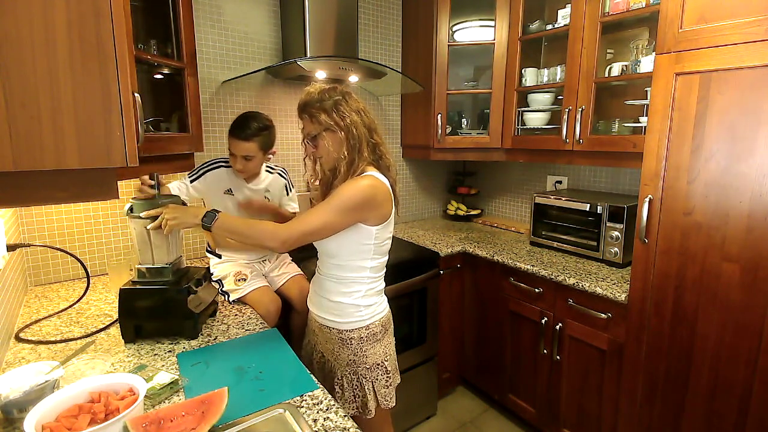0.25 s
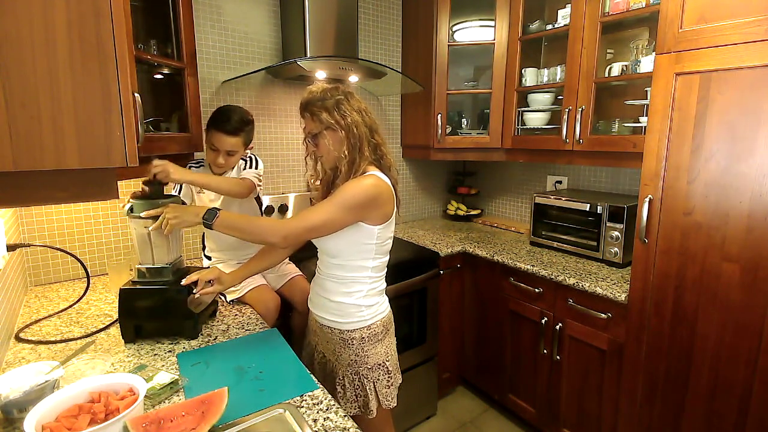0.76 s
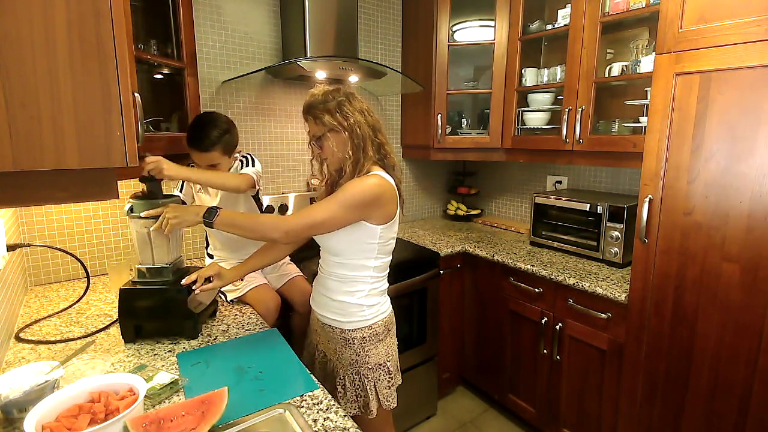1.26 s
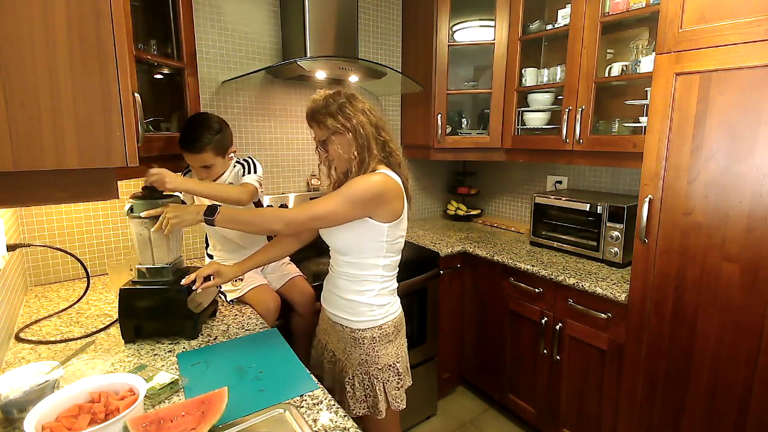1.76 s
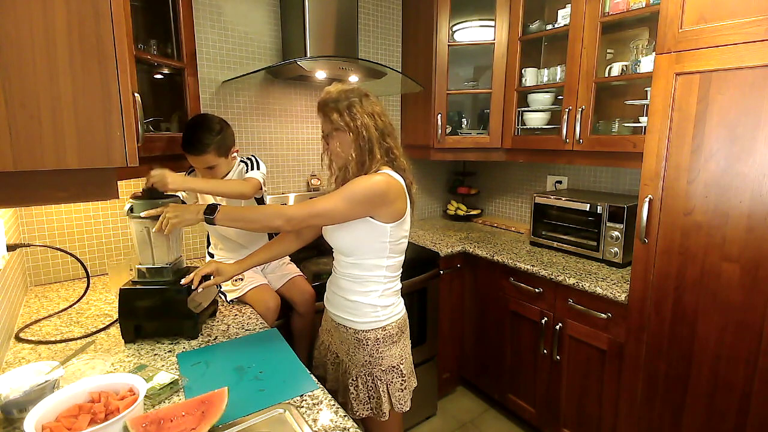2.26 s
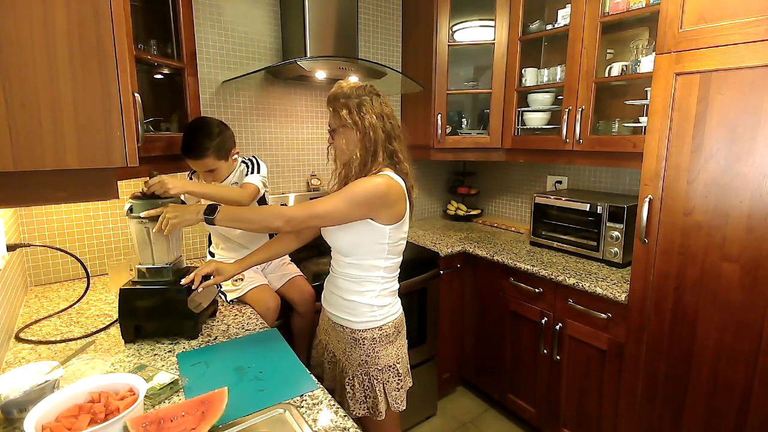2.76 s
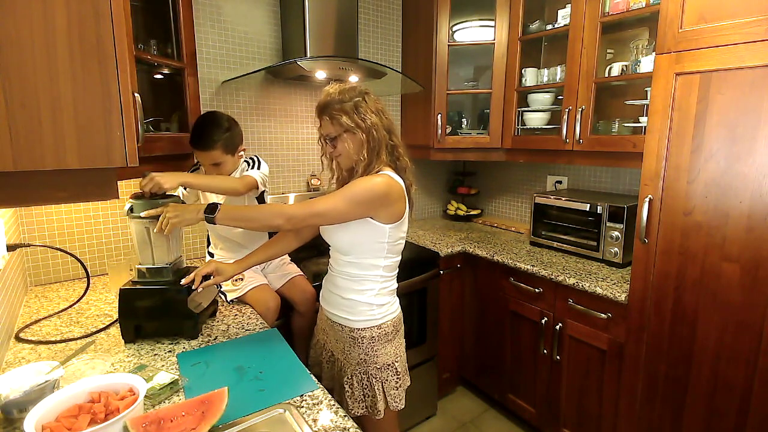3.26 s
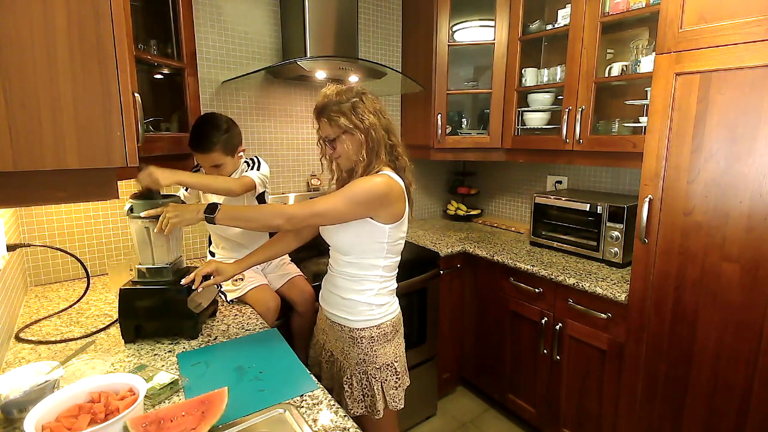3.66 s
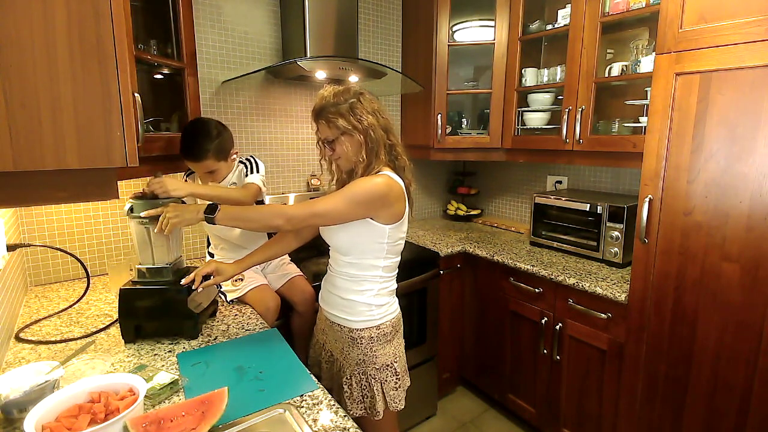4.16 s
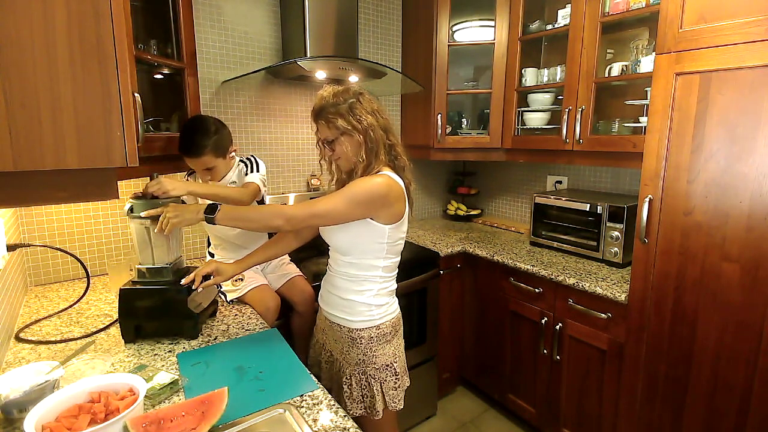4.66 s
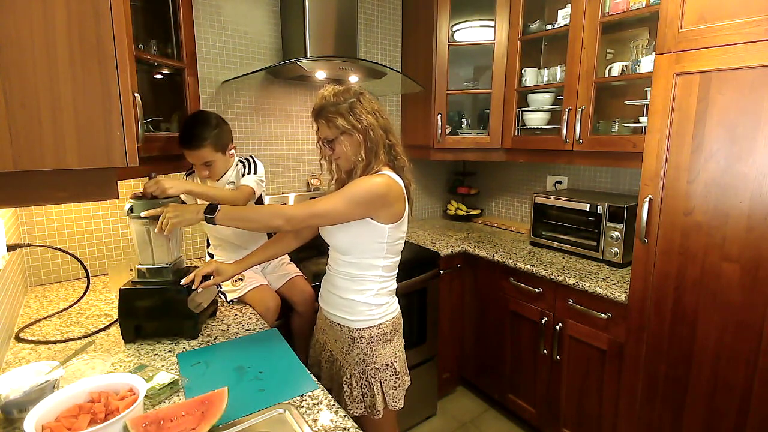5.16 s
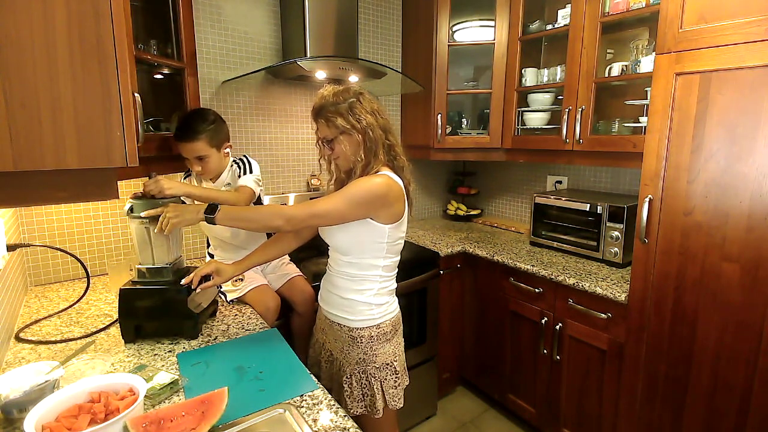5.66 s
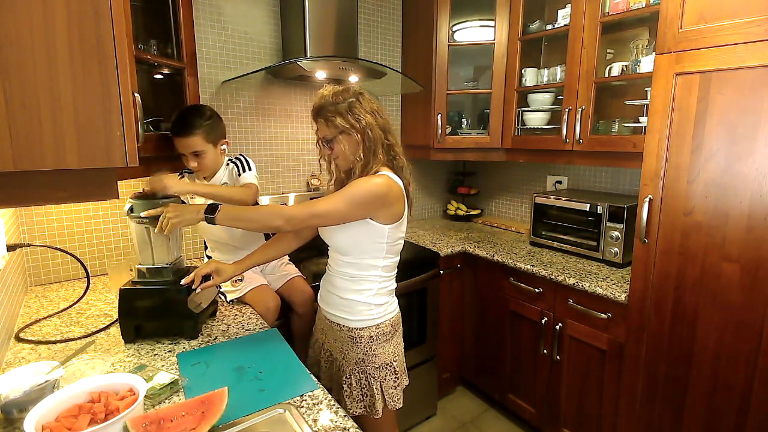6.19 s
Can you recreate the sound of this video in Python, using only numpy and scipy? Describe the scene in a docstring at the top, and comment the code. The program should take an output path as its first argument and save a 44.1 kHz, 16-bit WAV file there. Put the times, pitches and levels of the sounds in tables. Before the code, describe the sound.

A countertop blender roars steadily in a kitchen, with thin whines, gritty scrapes and chunks knocking the jar as the mix loosens.

```python
"""A blender roars on a kitchen counter, with thin whines, ticks, scrapes, knocks, low thuds and dull thumps.
Noise for swirling pulp and motor air rings the jar and housing; it brightens as the mix turns liquid.
The roar flares and pieces rattle where the blade catches a chunk. Whines are gliding sines, spray is
filtered ticks, scrapes are gritty band noise, knocks are short wandering rings, thumps are brief pushes.
The recorder leaves out the top, so all of it sounds dull above."""
import sys
import numpy as np
from scipy import signal
from scipy.fft import irfft, next_fast_len
from scipy.io import wavfile
from scipy.ndimage import uniform_filter1d

SR = 44100
rng = np.random.default_rng(int(sys.argv[2]) if len(sys.argv) > 2 else 0)


def output_pcm(signal):
    """Save a mono or channel-first signal as 16-bit PCM at the path in sys.argv[1].

    Samples are clipped to [-1, 1] before scaling.
    """
    pcm = np.clip(np.atleast_2d(signal).T, -1, 1) * 32767
    wavfile.write(sys.argv[1], SR, np.round(pcm).astype(np.int16))


N = 283563
T = np.arange(N) / SR

# Roar between catches. Each row: time in seconds, level in dB, low mids against it in dB (only their
# departure from the mean of the last third counts), counter hum level in dB.
CHURN_COURSE = [(0.0, -39.5, -27.5, -90), (0.45, -40, -21, -91), (0.62, -40, -28, -100),
                (0.92, -39.5, -25, -102), (1.1, -39.5, -24, -90), (1.45, -38, -22, -86),
                (1.75, -36, -20.5, -80), (2.17, -36.5, -18.5, -80.5), (2.4, -36.5, -19, -74.5),
                (2.55, -37, -22.5, -73.5), (2.7, -37.5, -19.5, -77), (2.9, -37.5, -21.5, -75),
                (3.1, -36, -23.5, -77.5), (3.45, -37.5, -30.5, -90), (3.8, -37, -21.5, -84),
                (4.15, -38, -28.5, -93), (4.5, -37.5, -27, -97), (5.4, -38, -27, -86),
                (6.43, -36.5, -31.5, -90)]
# How liquid the mix is. Each row: time in seconds, share from 0 thick to 1 liquid.
LIQUID_COURSE = [(0, 0.13), (1.3, 0.14), (1.6, 0.55), (4.2, 0.92), (6.43, 0.86)]
# Spectrum of the broad roar. Each row: frequency in Hz, relative density in dB per Hz.
ROAR_SPECTRUM = [(30, -35), (295, -32.5), (330, -30), (540, -19), (580, -14.5), (790, -10), (815, -0.5),
                 (1120, -10), (1250, -1), (2400, -1.5), (2850, -8), (3400, -5), (6700, -11), (7550, -15.5),
                 (7700, -23.5), (8750, -33), (9300, -66.5)]
# Jar and housing resonances. Each row: centre in Hz, width in Hz, level against the roar in dB with a
# thick mix, the same with a liquid mix.
JAR_MODES = [(327.6, 26, -44.5, -35.5), (448, 40, -41, -38), (587.4, 69, -35, -38), (829.5, 25.6, -20, -18),
             (996, 233, -20.5, -14.5), (1269, 200, -18, -12.5), (1490, 34, -10, -26.5),
             (1641, 39, -21.5, -14.5), (1738, 25, -15, -38.5), (2040, 89, -13.5, -21), (2140, 95, -27, -16),
             (2316, 110, -34.5, -10.5), (3024, 210, -12.5, -15), (3290, 32, -15.5, -21),
             (2653, 150, -32.5, -15.5), (4080, 68, -14.5, -26.5), (5800, 350, -23, -17)]
# Thin motor whines. Each row: start in seconds, length in seconds, start in Hz, end in Hz, level in dB.
MOTOR_WHINES = [(0.0, 0.17, 2040, 2070, -49), (0.0, 0.07, 1465, 1486, -47), (0.11, 0.19, 1490, 1480, -50),
                (0.28, 0.18, 1454, 1408, -52), (0.302, 0.13, 2050, 2090, -51),
                (0.5, 0.15, 1530, 1490, -54.5), (0.646, 0.14, 1710, 1690, -53),
                (0.656, 0.071, 2050, 2060, -43.5), (0.8, 0.086, 2070, 2080, -50),
                (0.939, 0.12, 2010, 2060, -48), (0.96, 0.11, 2140, 2180, -49), (1.0, 0.22, 1515, 1520, -53),
                (1.361, 0.15, 2085, 2050, -48.5), (1.702, 0.63, 3290, 3256, -55.5),
                (1.782, 0.55, 1665, 1660, -56), (2.87, 0.11, 2000, 2060, -51), (3.3, 0.41, 2130, 2124, -52),
                (4.047, 0.54, 3270, 3280, -54), (4.55, 0.34, 2116, 2123, -50),
                (4.94, 0.24, 2120, 2090, -50.5), (5.25, 0.11, 2115, 2080, -52),
                (4.863, 0.43, 3280, 3270, -53), (5.549, 0.38, 3290, 3265, -53),
                (6.197, 0.26, 3280, 3280, -53)]
# Knocks and low thuds. Each row: peak time in seconds, level in dB, pitch in Hz.
KNOCKS_AND_THUDS = [(0.41, -42, 980), (0.837, -41, 1504), (1.212, -38, 2065), (1.217, -37.5, 1460),
                    (1.316, -40, 1450), (1.351, -33, 1320), (1.352, -37, 1630), (1.348, -33.5, 1453),
                    (1.513, -44, 3800), (1.494, -38, 1173), (1.52, -47.5, 592), (1.558, -40, 2320),
                    (1.556, -37, 3450), (1.562, -39, 2970), (1.585, -40, 3110), (1.608, -44, 2900),
                    (1.657, -38, 1265), (1.643, -38, 1314), (1.652, -47, 3070), (1.67, -39.5, 4180),
                    (1.674, -45, 5380), (1.749, -41, 5180), (1.751, -42, 932), (1.816, -57, 325),
                    (1.826, -37, 1630), (1.969, -39, 1370), (2.036, -54, 510), (2.054, -40, 1014),
                    (2.261, -55, 480), (2.14, -57, 445), (2.46, -66, 466), (2.25, -70, 192),
                    (2.349, -38.5, 890), (2.53, -68, 191), (2.498, -40.5, 990), (2.561, -34, 1630),
                    (3.068, -37, 2580), (3.084, -32, 2420), (3.159, -33.5, 2410), (3.197, -31.5, 1625),
                    (3.211, -41.5, 820), (3.308, -41.5, 737), (3.567, -36, 2346), (3.586, -37, 3450),
                    (3.59, -62, 570), (3.601, -35.5, 2470), (3.626, -37, 2440), (3.64, -50, 540),
                    (3.67, -36, 3010), (3.707, -37, 2540), (3.657, -33, 2770), (3.601, -39, 840),
                    (3.67, -40, 807), (3.718, -40.5, 817), (3.714, -35, 2940), (3.72, -36, 3260),
                    (3.724, -46.5, 530), (3.885, -57, 470), (3.95, -52, 450), (3.956, -30.5, 1228),
                    (3.965, -35, 4070), (4.179, -34, 2420), (5.113, -44, 2380), (5.15, -40, 1254),
                    (5.278, -38, 1716), (5.522, -43, 4100), (6.028, -40.5, 844)]
# The blade catches and grinds a chunk. Each row: start in seconds, length in seconds, rise of the roar
# in dB, extra change of its low mids in dB.
CHUNK_CATCHES = [(0.275, 0.057, 1, -4), (0.346, 0.059, 3, -2), (0.66, 0.084, 0.5, -5), (1.206, 0.015, 2, 5),
                 (1.308, 0.067, 0, 2), (1.493, 0.18, 2, 2), (1.763, 0.029, 0.5, -12),
                 (2.015, 0.052, 0.5, 6), (2.12, 0.028, 1, 5), (2.234, 0.047, 0.5, 1),
                 (2.491, 0.069, 0.5, 5), (2.966, 0.11, 0.5, 4), (3.123, 0.093, 0, 4),
                 (3.3, 0.041, 0.5, 11.5), (3.551, 0.034, 1.5, 4), (3.595, 0.084, 1.5, 10.5),
                 (3.71, 0.024, 0, 13), (3.836, 0.1, 1, 3), (3.935, 0.045, 1.5, 6), (4.155, 0.036, 0, 13)]
# A chunk scrapes along the wall. Each row: start in seconds, length in seconds, centre in Hz,
# width in Hz, level in dB.
WALL_SCRAPES = [(0.27, 0.046, 2600, 200, -48), (0.353, 0.065, 3120, 600, -48),
                (0.337, 0.07, 2150, 500, -48), (1.2075, 0.014, 1800, 1400, -36),
                (1.225, 0.12, 1450, 400, -43), (1.333, 0.032, 1500, 700, -40),
                (1.505, 0.023, 4400, 2000, -45), (1.552, 0.015, 3200, 2000, -46),
                (1.578, 0.053, 865, 150, -43), (1.646, 0.047, 450, 140, -52.5),
                (1.66, 0.025, 4800, 2200, -48), (1.731, 0.073, 890, 200, -42.5),
                (2.23, 0.035, 835, 120, -45), (2.234, 0.04, 5500, 1500, -44.5),
                (2.26, 0.053, 2450, 400, -44), (2.33, 0.04, 1700, 700, -44), (2.399, 0.05, 1500, 700, -43),
                (2.486, 0.053, 2250, 250, -43), (2.98, 0.07, 2400, 500, -44), (3.142, 0.04, 2370, 600, -39),
                (3.301, 0.03, 487, 160, -55), (3.299, 0.035, 4500, 3000, -48),
                (3.552, 0.036, 3380, 250, -41), (3.575, 0.018, 4220, 800, -39),
                (3.591, 0.085, 500, 200, -51.5), (3.603, 0.035, 5830, 600, -50),
                (3.622, 0.03, 5000, 600, -41), (3.655, 0.02, 3800, 1400, -46),
                (3.846, 0.035, 2700, 600, -40), (3.868, 0.076, 5800, 300, -47),
                (3.94, 0.045, 5370, 1200, -40), (3.95, 0.022, 4300, 900, -49),
                (3.994, 0.04, 5950, 400, -44), (4.6, 0.16, 2170, 400, -43.5)]
# A heavy lump thumps the jar on the counter. Each row: centre time in seconds, level in dB, pitch in Hz.
JAR_THUMPS = [(1.515, -70, 150), (1.672, -62, 170), (1.777, -51, 230), (2.47, -64, 200), (3.312, -60, 190),
              (3.726, -72, 170), (3.955, -67, 180)]

THICK_TREBLE_DB, THICK_RUMBLE_DB = -5.5, 0.5  # fully thick against fully liquid
CATCH_TREBLE_SHARE, CATCH_RUMBLE_SHARE = 0.42, 0.14  # dB per dB of a catch's roar rise, low-mid change
RUMBLE_PER_LOW_MID = 0.35  # dB per dB
COUNTER_HZ, COUNTER_WIDTH_HZ = 191, 28
WHINE_EDGE_S, WHINE_WAVER, WHINE_FLUTTER_DB = 0.028, 0.003, 2.5  # waver as share of pitch
SPRAY_DB, SPRAY_PER_S, SPRAY_SPREAD_DB = -13.5, 1600, 5.5
SPRAY_CATCH_GAIN = 2.3  # dB per dB of a catch
SPRAY_LOW_HZ, SPRAY_HIGH_HZ = 2700, 6230
KNOCK_RISE = 0.3  # share of the length
KNOCK_MS, KNOCK_CYCLES = 16.5, 10.5  # length: fixed part plus cycles of the pitch
CRACK_DB = -9  # each crack partial against its knock
SPLINTER_DB, SPLINTER_SPREAD_DB = -18.5, 4
SPLINTER_CATCH_SHARE = 0.5  # extra dB per dB of a catch
CATCH_EDGE_S = 0.031
SCRAPE_ATTACK, SCRAPE_RELEASE = 0.15, 0.35  # shares of the length
SCRAPE_ROUGH_DB, SCRAPE_GRAIN_MS = 3.5, 3
RATTLE_DB, RATTLE_GAP_S, RATTLE_MS = 3, 0.009, 24  # least level against the mode; mean gap; length
THUMP_CYCLES = 0.45  # spread of the bell-shaped push
TOP_HZ = 8900


def undb(db):
    """Gain of a level in dB."""
    return np.exp(np.asarray(db) * (np.log(10) / 20))


def unit(x):
    """Scaled to rms 1."""
    return x / np.sqrt(np.mean(x ** 2))


def smooth_twice(x, size):
    """Two moving averages in a row."""
    return uniform_filter1d(uniform_filter1d(x, size), size)


def walk(rate_hz):
    """Random levels, each held for one period of the rate, then slewed twice; rms 1."""
    hold = int(SR / rate_hz)
    steps = np.repeat(rng.standard_normal(N // hold + 1), hold)
    return unit(smooth_twice(steps, hold)[:N])


def coloured(gain):
    """Fresh noise with the given gain per frequency bin."""
    size = next_fast_len(N)
    bins = np.arange(size // 2 + 1)
    spectrum = rng.standard_normal(size // 2 * 2 + 2).view(complex)
    return irfft(spectrum * gain(bins * SR / size + 1), size)[:N]  # + 1 Hz keeps the logs finite


def resonance(centre_hz, width_hz, drift=.003):
    """Noise ringing in one resonance whose centre drifts a little, rms 1."""
    pole = np.exp(-np.pi * width_hz / SR)
    swing = signal.lfilter([1], [1, -2 * pole, pole ** 2], rng.standard_normal((2, N)))
    phase = 2 * np.pi * centre_hz / SR * np.cumsum(1 + drift * walk(6))
    return unit(swing[0] * np.cos(phase) + swing[1] * np.sin(phase))


def roar(treble_db, low_db, rumble_db, liquid):
    """Turbulent pulp and air as broad noise bands with common and separate level changes, plus jar resonances."""
    spectrum_hz, spectrum_db = np.transpose(ROAR_SPECTRUM)
    surge = walk(6.3)

    def tilt_db(hz):
        """Departure of the roar around hz from its mean over the last third."""
        if hz < 390:
            course_db = rumble_db
        elif hz < 620:
            course_db = low_db
        else:
            course_db = treble_db if hz > 2700 else np.zeros(N)
        return course_db - course_db[-N // 3:].mean()

    out = np.zeros(N)
    for centre_hz in 40 * 2 ** np.arange(0, 8, .5):
        def band_gain(hz):
            """Roar spectrum under a cosine window, half an octave to each side."""
            window = np.cos(np.pi / 2 * np.clip(2 * np.log2(hz / centre_hz), -1, 1))
            return undb(np.interp(np.log(hz), np.log(spectrum_hz), spectrum_db)) * window

        # bands above 7 kHz: faster, deeper random level changes
        change_db = 1.18 * walk(25) if centre_hz < 7000 else 1.75 * walk(60)
        out += coloured(band_gain) * undb(tilt_db(centre_hz) + 0.1 * surge + change_db)
    out = undb(-1.0) * out / np.sqrt(np.mean(out[-N // 3:] ** 2))
    for centre_hz, width_hz, thick_db, liquid_db in JAR_MODES:
        # the sloshing mix damps each resonance on and off
        mode_db = thick_db + (liquid_db - thick_db) * liquid
        out += resonance(centre_hz, width_hz) * undb(mode_db + tilt_db(centre_hz) + 2.03 * walk(18))
    return out


def counter_hum(level_db):
    """Noise ringing one low resonance of the counter, its level wandering slowly."""
    return resonance(COUNTER_HZ, COUNTER_WIDTH_HZ) * undb(level_db + 2.5 * walk(3.1))


def whines():
    """Near-pure tones that glide, waver in pitch and flutter in level."""
    out = np.zeros(N)
    waver, flutter_db = WHINE_WAVER * walk(14), WHINE_FLUTTER_DB * walk(30)
    shifts = rng.integers(0, N, len(MOTOR_WHINES))  # each whine reads the wander elsewhere
    for (start_s, length_s, start_hz, end_hz, db), shift in zip(MOTOR_WHINES, shifts):
        on = slice(int(max(start_s, 0) * SR), int((start_s + length_s) * SR))
        age_s = T[on] - start_s
        glide_hz = start_hz + (end_hz - start_hz) * age_s / length_s
        hz = glide_hz * (1 + np.roll(waver, shift)[on])
        fade = np.clip(np.minimum(age_s, length_s - age_s) / WHINE_EDGE_S, 0, 1)
        gain = np.sqrt(2) * fade * undb(db + np.roll(flutter_db, shift)[on])
        out[on] += gain * np.sin(2 * np.pi * np.cumsum(hz) / SR)
    return out


def spray(level_db):
    """Grit and droplets flung at the wall: dense sharp ticks of uneven size."""
    hit, size, sign = rng.random((3, N))
    size_gain = undb(-SPRAY_SPREAD_DB * np.log(size + 0.0059))
    ticks = (hit < SPRAY_PER_S / SR) * size_gain * np.sign(sign - .5)
    band = signal.butter(5, [SPRAY_LOW_HZ, SPRAY_HIGH_HZ], "bandpass", fs=SR, output="sos")
    return unit(signal.sosfilt(band, ticks)) * undb(level_db + SPRAY_DB)


def add_knock(out, peak_s, db, hz, length_ms, chance, noisy):
    """One knock: a short ring that swells and dies, its pitch wandering at random."""
    n = int(length_ms * SR / 1000)
    i = int(peak_s * SR - KNOCK_RISE * n)
    if i >= 0 and i + n < N:
        two_cycles = int(2 * SR / hz)
        wander = noisy * np.sqrt(hz / SR) * np.cumsum(smooth_twice(chance, two_cycles)[:n])
        age = np.linspace(0, 1, n)
        shape = np.sin(np.pi * age ** (np.log(.5) / np.log(KNOCK_RISE))) ** 2
        ring = np.sin(2 * np.pi * hz * T[:n] + wander + 2 * chance[-1])
        out[i:i + n] += undb(db) * np.sqrt(2) * shape * ring


def knocks_and_splinters(level_db):
    """Listed knocks and low thuds, each a ring and a broader crack, over small splinters."""
    out, cracks = np.zeros(N), np.zeros(N)
    for peak_s, db, hz in KNOCKS_AND_THUDS:
        length_ms = KNOCK_MS + 1000 * KNOCK_CYCLES / hz
        add_knock(out, peak_s, db, hz, length_ms, rng.standard_normal(6000), noisy=0.086)
        for pitch in rng.standard_normal(3):
            crack_hz = hz * 2 ** (0.05 + 0.2 * pitch)
            add_knock(cracks, peak_s, db, crack_hz, length_ms, rng.standard_normal(6000), noisy=0.83)
    # the splinters follow the level of the roar
    for when, pitch, size, length in rng.random((700, 4)):
        db = level_db[int(when * N)] + SPLINTER_DB - SPLINTER_SPREAD_DB * np.log(size + 0.025)
        hz, length_ms = 800 * 2 ** (2.6 * pitch), 5.202 + 15 * length
        add_knock(out, when * N / SR, db, hz, length_ms, rng.standard_normal(1500), noisy=0.92)
    return out + undb(CRACK_DB) * cracks


def catches():
    """Change of the whole roar and extra change of its low mids, in dB, with straight edges in and out."""
    rise_db, low_db = np.zeros(N), np.zeros(N)
    for start_s, length_s, db, extra_db in CHUNK_CATCHES:
        inside_s = np.minimum(T - start_s, start_s + length_s - T)
        hold = np.clip(inside_s / CATCH_EDGE_S + .5, 0, 1)
        rise_db += db * hold
        low_db += extra_db * hold
    return rise_db, low_db


def scrapes():
    """Grainy noise in one band: quick start, uneven hold, softer end."""
    out = np.zeros(N)
    grain = int(SCRAPE_GRAIN_MS * SR / 1000)
    for start_s, length_s, hz, width_hz, db in WALL_SCRAPES:
        i, n = int(start_s * SR), int(length_s * SR)
        hiss, rough = rng.standard_normal((2, 8000))
        band = signal.butter(2, [hz - width_hz / 2, hz + width_hz / 2], "bandpass", fs=SR, output="sos")
        age = np.linspace(0, 1, n)
        shape = np.clip(np.minimum(age / SCRAPE_ATTACK, (1 - age) / SCRAPE_RELEASE), 0, 1)
        grit = hiss * undb(SCRAPE_ROUGH_DB * unit(uniform_filter1d(rough, grain)))
        out[i:i + n] += unit(signal.sosfilt(band, grit)[-n:]) * shape * undb(db)
    return out


def rattle(level_db):
    """Pieces of a ground chunk clatter on the wall, each ringing one upper resonance of the jar."""
    out = np.zeros(N)
    upper = [mode for mode in JAR_MODES if mode[0] > 700]
    for start_s, length_s, _, _ in CHUNK_CATCHES:
        for step, (late, which, size) in enumerate(rng.random((30, 3))):
            peak_s = start_s + RATTLE_GAP_S * (step + late)
            chance = rng.standard_normal(3000)
            if peak_s < start_s + length_s:
                hz, _, _, liquid_db = upper[int(which * len(upper))]
                db = level_db[int(peak_s * SR)] + RATTLE_DB + liquid_db + 6 * size
                add_knock(out, peak_s, db, hz, RATTLE_MS, chance, noisy=0.5)
    return out


def thumps():
    """One dull push each, hardly more than a cycle."""
    out = np.zeros(N)
    for centre_s, db, hz in JAR_THUMPS:
        near = slice(int((centre_s - .03) * SR), int((centre_s + .03) * SR))
        turns = (T[near] - centre_s) * hz
        bell = np.exp(-.5 * (turns / THUMP_CYCLES) ** 2)
        out[near] += np.sqrt(2) * undb(db) * bell * np.sin(2 * np.pi * turns)
    return out


def scene():
    """Sum of all sources, heard from one point."""
    churn_s, *churn_db = np.transpose(CHURN_COURSE)
    level_db, low_db, hum_db = (np.interp(T, churn_s, column) for column in churn_db)
    liquid = np.interp(T, *np.transpose(LIQUID_COURSE))
    rise_db, catch_low_db = catches()
    muffle_db = THICK_TREBLE_DB * (1 - liquid)
    treble_db = muffle_db + CATCH_TREBLE_SHARE * rise_db
    rumble_db = (THICK_RUMBLE_DB * (1 - liquid) + CATCH_RUMBLE_SHARE * catch_low_db
                 + RUMBLE_PER_LOW_MID * low_db)
    mix = roar(treble_db, low_db + catch_low_db, rumble_db, liquid) * undb(level_db + rise_db)
    mix += counter_hum(hum_db + rise_db)
    mix += whines()
    mix += spray(level_db + muffle_db + SPRAY_CATCH_GAIN * np.maximum(rise_db, 0))
    mix += knocks_and_splinters(level_db + (1 + SPLINTER_CATCH_SHARE) * rise_db)
    mix += scrapes()
    mix += rattle(level_db + rise_db)
    mix += thumps()
    return mix[None]


def record(dry):
    """The recorder cuts the top steeply."""
    return signal.sosfilt(signal.ellip(8, .2, 50, TOP_HZ, fs=SR, output="sos"), dry)


dry = scene()
out = record(dry)
output_pcm(out)
```